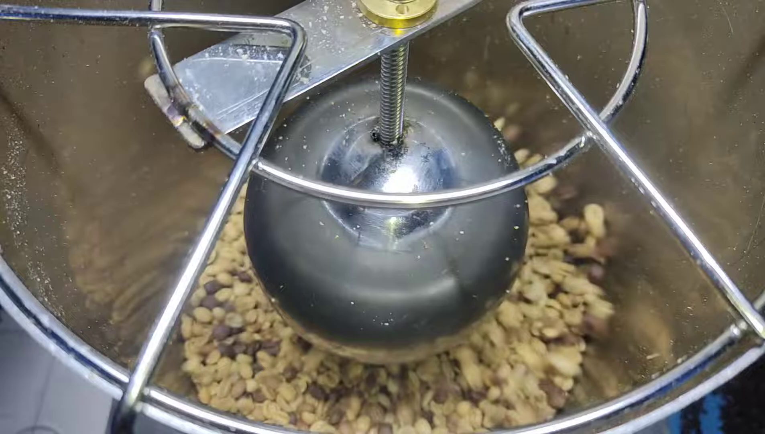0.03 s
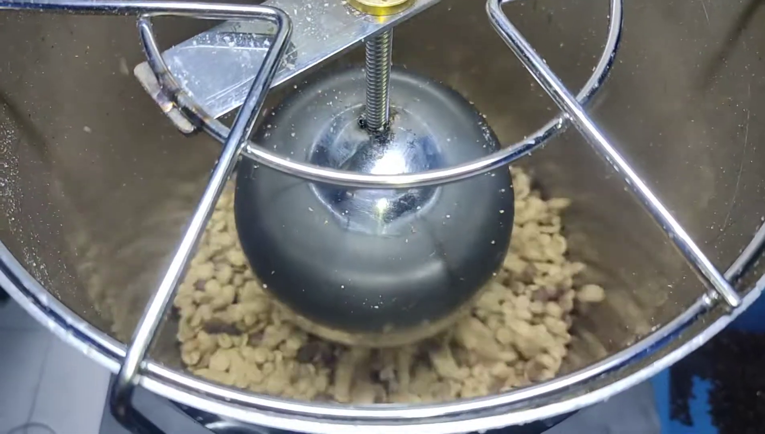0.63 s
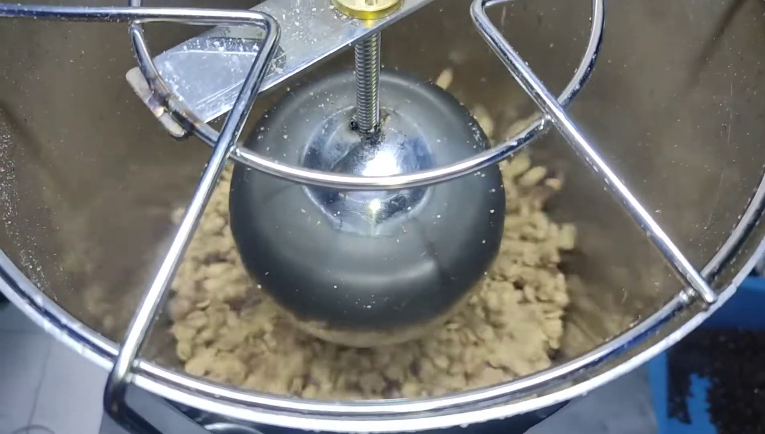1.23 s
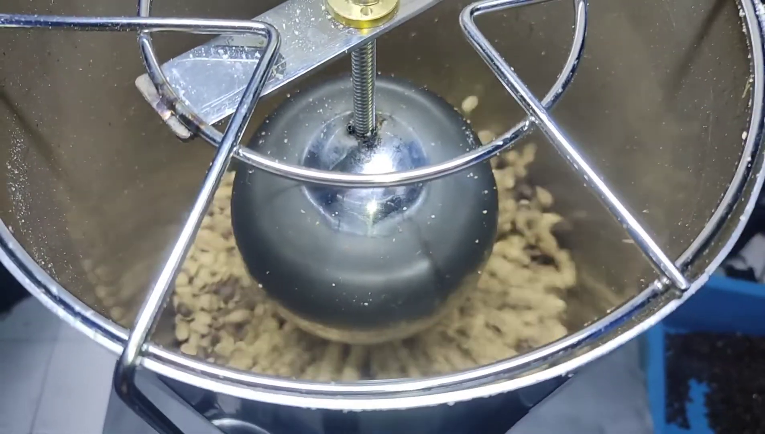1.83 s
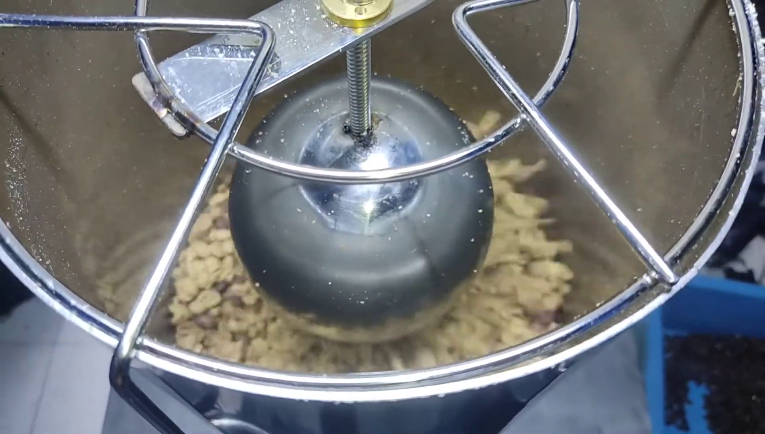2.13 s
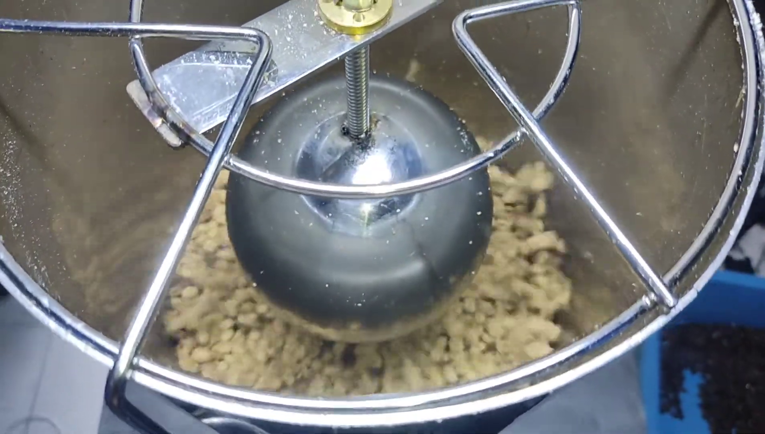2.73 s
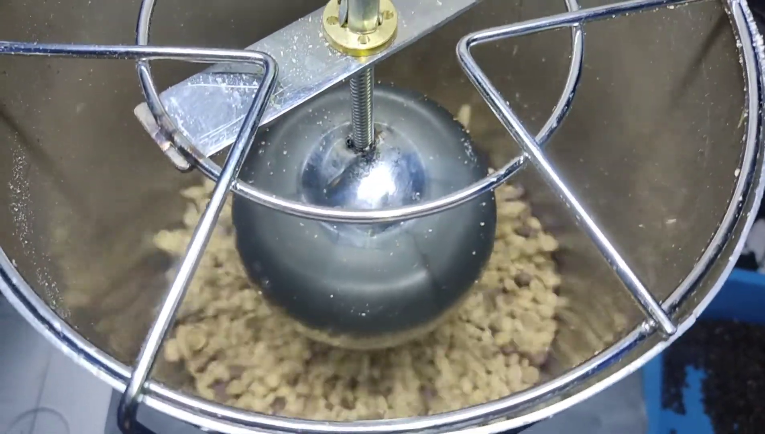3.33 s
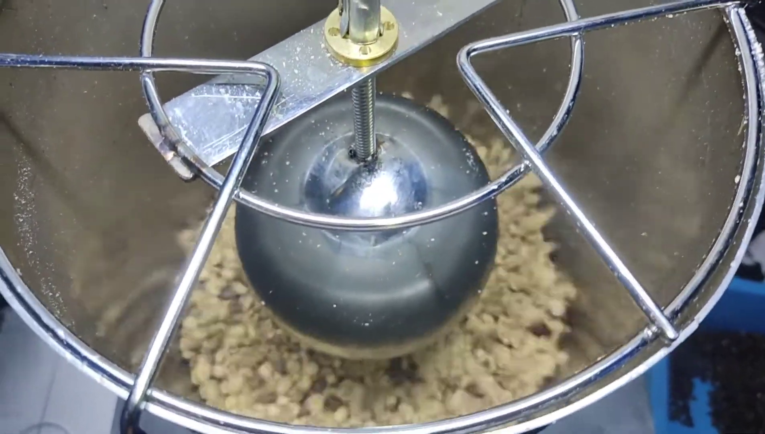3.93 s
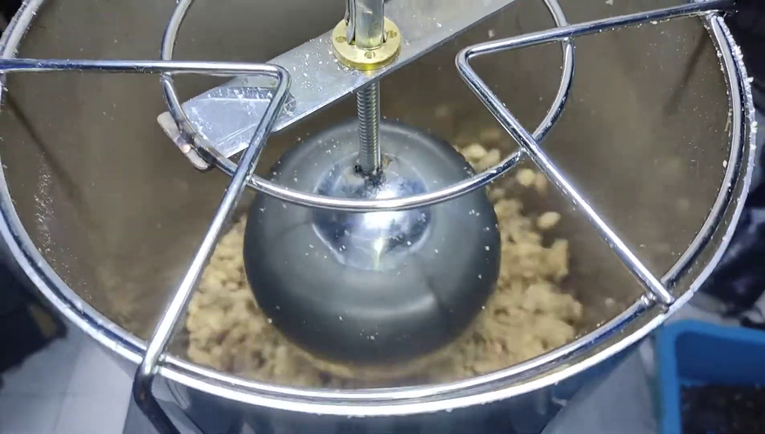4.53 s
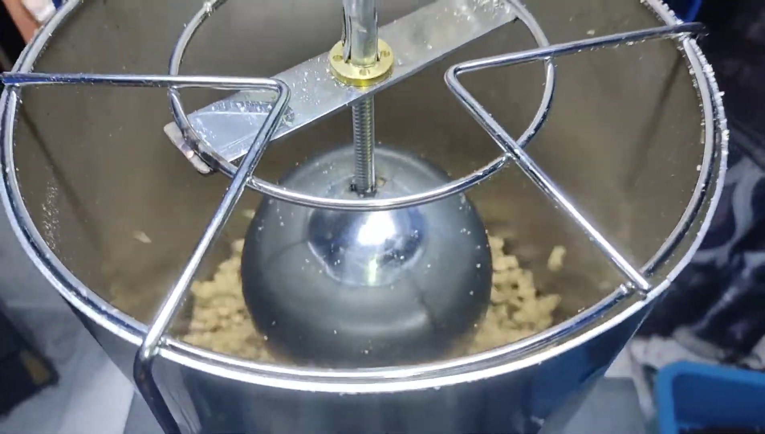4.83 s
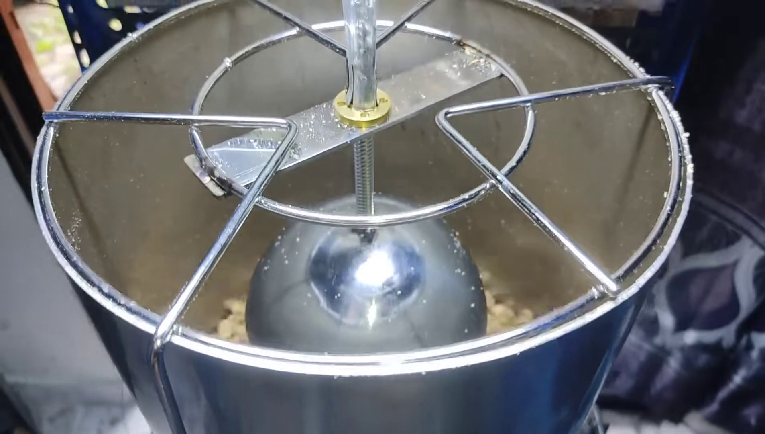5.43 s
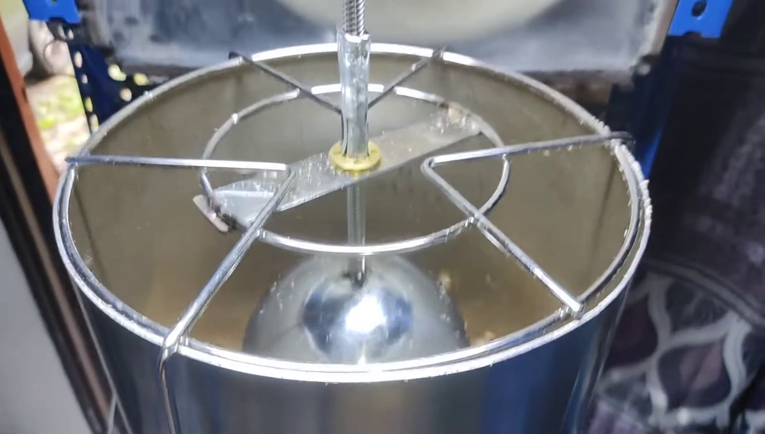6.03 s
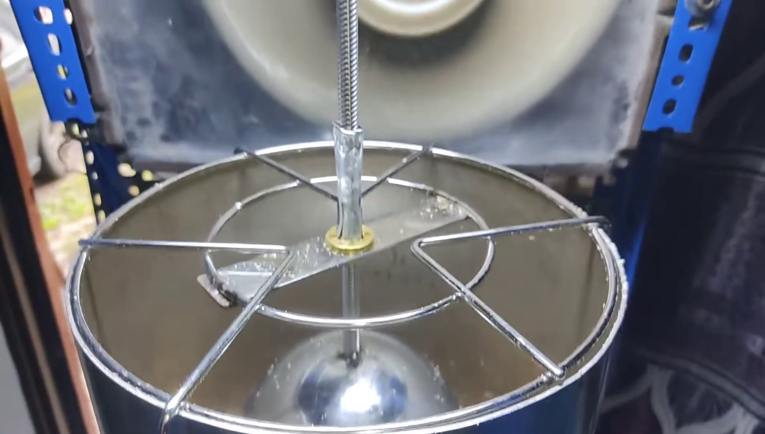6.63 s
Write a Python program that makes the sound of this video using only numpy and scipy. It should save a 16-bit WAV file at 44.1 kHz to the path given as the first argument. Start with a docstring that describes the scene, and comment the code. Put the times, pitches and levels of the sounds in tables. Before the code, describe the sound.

A hot-air coffee roaster roars steadily while beans churn and rattle in its steel drum, with a thin high whine.

```python
"""A hot-air coffee roaster, heard from just above its open steel drum. The sound fades in quickly:
the motor hums and the blower roars through the hollow drum. All along, thousands of beans a second
spout up, knock together, patter on the wall and keep a steel ball in the middle ringing with a thin
whine. Now and then one bean hits hard. At about 4.5 seconds the listener draws back from the drum,
so its hollow ringing fades and its brighter steel tones stand out."""
import sys
import numpy as np
from scipy import signal
from scipy.fft import rfft, irfft
from scipy.io import wavfile
from scipy.ndimage import uniform_filter1d

SR = 44100
rng = np.random.default_rng(int(sys.argv[2]) if len(sys.argv) > 2 else 0)


def wav_record(signal):
    """Record a signal, one row per channel, as 16-bit PCM in the file named by sys.argv[1]."""
    frames = np.transpose(np.atleast_2d(signal))
    bounded = np.clip(frames, -1, 1)
    # unit amplitude maps onto the largest positive 16-bit level
    quanta = np.round(bounded * 32767).astype(np.int16)
    wavfile.write(sys.argv[1], SR, quanta)


N = 294588
TIME = np.arange(N) / SR

# Puffs of rising air. Each row: middle in seconds, length in seconds, level in dB.
AIR_PUFFS = [(0.45, .08, -35), (.73, .1, -36), (1.4, .09, -36), (6.5, .45, -46)]
# The motor's hum. Each row: pitch in Hz, level in dB.
HUM_TONES = [(169, -37), (338, -43.5), (507, -42), (1724, -51)]
# The tone colour of rushing air. Each row: frequency in Hz, left and right relative level in dB.
ROAR_COLOUR = [(20, -19.5, -23), (55, -25.5, -22.5), (97, -18.5, -18.5), (138, -7, -14.5),
               (196, -3.5, -6.5), (285, -1, -5.5), (430, -4, -5.5), (620, -4, -5.5), (780, -3.5, -9),
               (1130, -9.5, -2.5), (1354, -6.5, -4), (1600, -17.5, -16), (3050, -28, -17.5),
               (8250, -49, -61)]
# Pitches that the air in drum and duct favours. Each row: pitch in Hz, width in Hz, boost in dB.
AIR_RESONANCES = [(186.4, 9.9, 4.5), (238.3, 50, 7.5), (278.7, 16, 6.5), (311, 9.2, 4.5), (370.6, 9.8, 3),
                  (436, 12, 1), (507, 49, 6), (554.6, 18.5, 5), (611.4, 21, 4)]
# Standing waves across the drum's mouth. Each row: pitch in Hz, width in Hz, left and right level
# in dB, change in dB after drawing back.
MOUTH_WAVES = [(859, 59, -31.5, -29, 2), (936, 94, -35, -44, 5), (1041, 212, -25, -22, -3)]
# Stronger gusts in the roar. Each row: middle in seconds, length in seconds, boost in dB.
ROAR_GUSTS = [(.78, .08, 2.5), (.98, 0.18, 1.4), (1.3, 0.12, 1.5), (1.73, .1, 1), (2.1, .1, 0.8),
              (2.39, 0.051, 1.7), (4.72, 0.092, 0.5), (5.95, .1, 1.8)]
# The drum's note swells with the stream. Each row: middle in seconds, length in seconds, boost in dB.
NOTE_SWELLS = [(.44, 0.11, 7), (1.1, .08, 3), (2.05, 0.15, 3), (2.38, 0.11, 7), (3.03, 0.073, 7),
               (4.01, 0.11, 10), (5.0, 0.083, 2), (5.16, 0.098, 9), (5.83, .07, 8.5)]
# Drum tones rung by beans. Each row: pitch in Hz, width in Hz, left and right level in dB,
# change in dB after drawing back.
DRUM_RINGS = [(1834, 216, -41, -30, -11.5), (2174, 250, -34.5, -32, -21), (3344, 110, -47, -40.5, -5),
              (4660, 130, -58, -53, 12), (5550, 100, -53, -47, 7.5), (5700, 54, -54, -42, 12),
              (6210, 170, -43, -49, 10), (7600, 430, -43, -38.5, 16), (8350, 710, -39, -49, 13),
              (9530, 200, -47, -54, 10)]
# The high pings of a faint shimmer. Each row: pitch in Hz, relative level in dB.
SHIMMER_TONES = [(3350, -44), (3800, -42), (4080, -41), (4340, -41.5), (4620, -40), (4860, -42),
                 (5280, -40), (5520, -40), (6110, -38.5), (6420, -39), (9830, -42), (10270, -43),
                 (10700, -42), (10950, -43), (11800, -42), (12400, -43), (12800, -41), (13530, -45)]
# Pitches that the steel wall favours or weakens. Each row: pitch in Hz, width in Hz, change in dB.
WALL_RESONANCES = [(2230, 200, 1.5), (2870, 180, 1.5), (3560, 170, -2), (3740, 120, 2.5), (5280, 110, 4),
                   (5520, 110, 3.5), (5880, 110, -3), (6070, 170, 4), (6750, 130, 3.5), (7480, 160, 1.5),
                   (8000, 140, -2.5), (8170, 300, 3.5), (9830, 100, 5), (10270, 140, 4), (10480, 110, -3),
                   (10620, 110, 4.5), (10900, 200, 3), (11816, 130, 3), (12010, 90, -2.5),
                   (12600, 220, 2.5), (13310, 150, -7), (13530, 140, 3)]
# The colour of bean on bean. Each row: frequency in Hz, left and right relative level in dB.
CLATTER_COLOUR = [(300, -20, -20), (1200, -9, -5), (1750, -8, -1.5), (2000, -8, -.5), (2250, -3.5, 2.5),
                  (2550, -6, -2.5), (2800, -4.5, -.5), (3600, -12, -8), (4700, -13, -9), (5800, -17, -15),
                  (8000, -20, -18), (14000, -30, -30)]
# The colour of bean on steel. Each row: frequency in Hz, left and right relative level in dB.
PATTER_COLOUR = [(2500, -28, -28), (4300, -13, -10), (5100, -14.5, -13), (5900, -13, -12.5),
                 (6450, -8.5, -7), (7100, -4, .5), (7650, -2, 5), (8300, -1, -2.5), (8950, 2.5, -5),
                 (9500, -3.5, -12), (10050, -15, -18.5), (10900, -11.2, -10.4), (11400, -12, -11.7),
                 (12900, -8.5, -7.2), (13400, -12, -12), (14200, -16, -16)]
# The spray on the wall thickens or thins. Each row: middle in seconds, length in seconds, change in dB.
BEAN_SPRAYS = [(1.9, 0.27, 1.5), (3.02, .12, 0), (3.32, 0.18, 1), (4.04, .1, 0.5), (4.4, .12, -0.5),
               (5.11, .06, 3), (5.4, 0.2, 2.5), (5.98, 0.17, 1.5), (6.27, 0.16, 3), (6.53, 0.21, 3.5)]
# Single beans that hit the wall hard. Each row: start in seconds, strength in dB.
HARD_HITS = [(1.182, -21), (1.251, -19), (1.392, -11), (4.278, -12), (4.659, -19), (4.701, -19),
             (5.119, -17), (6.389, -11)]
# The colour of a hard hit. Each row: frequency in Hz, left and right gain in dB.
HIT_COLOUR = [(800, -20, -20), (2300, -3, -1), (5500, -4, -3), (7700, 0, 2), (10000, -5, -6),
              (13000, -3, -3)]
# The ball's tones. Each row: pitch in Hz, seconds to fade by 60 dB, left and right relative level in dB.
BALL_TONES = [(8905, .05, -2, -4.5), (9188, .2, 5.5, -8)]
# More or fewer beans reach the ball. Each row: middle in seconds, length in seconds, change in dB.
WHINE_SWELLS = [(.4, .12, 3), (.69, 0.071, 6.5), (.9, 0.26, 5), (1.1, .06, 1), (1.33, 0.24, 5),
                (1.49, .06, -3), (1.6, .06, 7), (1.77, 0.092, -6), (2.2, 0.17, 2), (2.325, 0.05, 6),
                (2.56, 0.14, 4.5), (3.2, .06, 3), (3.36, 0.12, 1), (3.58, 0.19, -4), (3.85, 0.072, 4),
                (4.06, 0.077, 4.5), (4.23, 0.068, 5), (4.45, .1, -1), (4.66, .1, 4.5), (4.82, 0.077, 3),
                (4.99, .14, -5), (5.4, 0.17, 5.5), (5.87, 0.25, 7), (6.18, .08, 6), (6.35, .14, -7)]
# The opening fade. Each row: time in seconds, gain from 0 to 1.
FADE_IN = [(.2302, 0), (.2312, .22), (.28, .38), (.47, 1)]

LEFT_LAG_S = 0.00022  # the roar reaches the right ear first


def undb(db):
    """Turn decibels into a gain to multiply by."""
    return 10 ** (np.asarray(db) / 20)


def unit(x):
    """Scale a signal so that its average power is 1."""
    return x / np.sqrt(np.mean(x ** 2))


def flutter(per_s):
    """A smooth random wobble of size about 1, with per_s new values a second."""
    hold = int(SR / per_s)
    steps = rng.standard_normal(N)[np.arange(N) // hold]
    return unit(uniform_filter1d(uniform_filter1d(steps, hold), hold))


def hump(middle_s, length_s):
    """A rounded rise and fall, 1 at its middle."""
    return np.exp(-(2 * (TIME - middle_s) / length_s) ** 2)


def swelling(table):
    """A gain that smoothly rises or dips once for each row."""
    return undb(sum(db * hump(middle_s, length_s) for middle_s, length_s, db in table))


def drawn_back(near_db, change_db, start_s=4.55, length_s=0.86):
    """A layer's gain as the listener moves from above the mouth to beside the drum."""
    progress = np.clip((TIME - start_s) / length_s, 0, 1)
    return undb(near_db + change_db * (1 - np.cos(np.pi * progress)) / 2)


def resonance(x, hz, width):
    """What a hollow or a panel lets through around its own pitch, at power 1."""
    band = signal.butter(2, [hz - width / 2, hz + width / 2], "bandpass", fs=SR, output="sos")
    return unit(signal.sosfilt(band, x))


def colour(x, spectrum, resonances, size=4096):
    """Give each ear its tone colour, with a peak or dip at each resonance."""
    hz = np.maximum(np.arange(size // 2 + 1) * SR / size, 1)
    points, *sides = np.transpose(spectrum)
    db = np.array([np.interp(np.log(hz), np.log(points), side) for side in sides])
    for centre, width, boost in resonances:
        db = db + boost / (1 + (2 * (hz - centre) / width) ** 2)
    # build a filter that rings only after a sound, never before it
    cepstrum = irfft(np.log(undb(db)))
    cepstrum[:, 1:size // 2] *= 2
    cepstrum[:, size // 2 + 1:] = 0
    response = irfft(np.exp(rfft(cepstrum)))
    return signal.fftconvolve(x, response, axes=1)[:, :N]


def air_stream(room_db, flutter_db=-0.43):
    """Swirling air makes noise; part comes back from the room, different in each ear."""
    stream = rng.standard_normal(N) * undb(flutter_db * flutter(per_s=40))
    direct = np.array([np.interp(TIME - LEFT_LAG_S, TIME, stream), stream])
    return direct + undb(room_db) * rng.standard_normal((2, N))


def draught(steady_db=-50, cutoff_hz=35, left_boost_db=6.0):
    """Rising air buffets the microphones: a faint rumble with a few soft puffs."""
    low_pass = signal.butter(2, cutoff_hz, fs=SR, output="sos")
    rumble = signal.sosfilt(low_pass, air_stream(room_db=15))
    puffs = sum(undb(db) * hump(middle_s, length_s) for middle_s, length_s, db in AIR_PUFFS)
    return (undb(steady_db) + puffs) * unit(rumble * undb([[left_boost_db], [0]]))


def motor(wander=0.00184, waver_db=2):
    """The motor hums with tones that follow its slightly unsteady shaft."""
    shaft_s = np.cumsum(1 + wander * flutter(per_s=5)) / SR
    out = 0
    for hz, db in HUM_TONES:
        strength = np.sqrt(2) * undb(db + waver_db * flutter(per_s=7.6))
        out = out + strength * np.sin(2 * np.pi * hz * shaft_s)
    return out


def drum_note(hz=251, left_db=-29, right_db=-33, wander=0.01794, waver_db=2.5):
    """The stream blows the drum like a bottle: a hollow note that wavers around one pitch."""
    phase = 2 * np.pi * np.cumsum(hz * (1 + wander * flutter(per_s=30))) / SR
    lag = np.array([[2 * np.pi * hz * LEFT_LAG_S], [0]])
    strength = swelling(NOTE_SWELLS) * undb(waver_db * flutter(per_s=18))
    return np.sqrt(2) * undb([[left_db], [right_db]]) * strength * np.sin(phase - lag)


def standing_waves():
    """Swirling air also sounds the hollow tones that fit across the drum."""
    out = 0
    for hz, width, left_db, right_db, change_db in MOUTH_WAVES:
        gain = drawn_back(np.array([[left_db], [right_db]]), change_db)
        out = out + gain * resonance(air_stream(room_db=-5.5), hz, width)
    return out


def blower(gust_db=0.75):
    """The air stream roars in small gusts through the duct and drum."""
    gusts = undb(gust_db * flutter(per_s=22))
    return gusts * unit(colour(air_stream(room_db=-24.5), ROAR_COLOUR, AIR_RESONANCES))


def shimmer(count=260, ring_s=.065, pitch_spread=.014, spread_db=6.0, boost_db=1.0):
    """Dense, short, slightly detuned high pings give the rattle a faint ringing shimmer."""
    t = TIME[:int(ring_s * SR)]
    fading = undb(-60 * t / ring_s)
    out = 0
    for hz, db in SHIMMER_TONES:
        pings = np.zeros((2, N + len(t)))
        starts = rng.integers(0, N, count)
        for start, (detune, loudness) in zip(starts, rng.standard_normal((count, 2))):
            # each ear catches the wave at a different point in its cycle
            cycles = hz * (1 + pitch_spread * detune) * t + rng.random((2, 1))
            strength = undb(spread_db * min(loudness, 1))
            pings[:, start:start + len(t)] += strength * fading * np.sin(2 * np.pi * cycles)
        out = out + undb(db + boost_db) * unit(pings[:, :N])
    return out


def impacts(per_s, spread_db):
    """Clicks at random moments, some harder than others."""
    happens = rng.random(N) < per_s / SR
    strength = undb(spread_db * np.minimum(rng.standard_normal(N), 2))
    return happens * strength * rng.choice([-1, 1], N)


def drum_knocks(per_s, spread_db, crack_s, ring_s, ring_db, spots=16):
    """Beans land at several spots; each has its own crack and echoes round the wall to each ear."""
    t = TIME[:SR // 12]
    decay = np.exp(-t / crack_s) + undb(ring_db) * np.exp(-t / ring_s)
    out = 0
    for _ in range(spots):
        echoes = unit(decay * rng.standard_normal((2, len(t))))
        clicks = impacts(per_s / spots, spread_db)
        out = out + signal.oaconvolve(clicks[None], echoes, axes=1)[:, :N]
    return unit(out)


def drum_ringing():
    """Beans ring the drum: a hollow tone over the mouth, brighter steel tones from the side."""
    knocks = drum_knocks(per_s=900, spread_db=4.5, crack_s=0.0001, ring_s=0.0047, ring_db=-2, spots=12)
    out = 0
    for hz, width, left_db, right_db, change_db in DRUM_RINGS:
        gain = drawn_back(np.array([[left_db], [right_db]]), change_db)
        out = out + gain * resonance(knocks, hz, width)
    return out


def hard_hits(ring_s=.004):
    """A lone bean cracks against the wall and rings it briefly."""
    force = sum(undb(db) * (TIME >= s) * np.exp(-abs(TIME - s) / ring_s) for s, db in HARD_HITS)
    return colour(force * rng.standard_normal((2, N)), HIT_COLOUR, WALL_RESONANCES)


def ball_whine(flicker_db=1.3, even_s=0.067):
    """Beans strike the steel ball so often that its high, shimmering tones never die away."""
    out = 0
    for hz, fade_s, left_db, right_db in BALL_TONES:
        pole = np.exp((2j * np.pi * hz - np.log(1000) / fade_s) / SR)  # one sample's turn and decay
        ring = signal.lfilter([1], [1, -pole], impacts(per_s=500, spread_db=2))
        # the steady hail keeps the ringing equally strong over longer stretches
        power = uniform_filter1d(abs(ring) ** 2, int(even_s * SR))
        ring = ring / np.sqrt(power + 1e-9)
        # the two ears hear each tone a quarter cycle apart
        out = out + np.array([undb(left_db) * unit(ring.real), undb(right_db) * unit(ring.imag)])
    return swelling(WHINE_SWELLS) * undb(flicker_db * flutter(per_s=28)) * out


def bean_clatter():
    """Beans knock together in the churning heap and rattle the drum."""
    knocks = drum_knocks(per_s=1900, spread_db=3.5, crack_s=0.0001, ring_s=0.01, ring_db=-4.5)
    return unit(colour(knocks, CLATTER_COLOUR, WALL_RESONANCES))


def wall_patter():
    """Flung beans tick brightly on the steel wall, now and then in a thicker spray."""
    ticks = drum_knocks(per_s=650, spread_db=2.0, crack_s=0.00019, ring_s=0.015, ring_db=-7)
    return swelling(BEAN_SPRAYS) * unit(colour(ticks, PATTER_COLOUR, WALL_RESONANCES))


def scene(surge_db=.55):
    """Mix the air and the motor with the surging beans and the ringing ball."""
    roar = drawn_back(near_db=-18, change_db=-1) * blower() + standing_waves()
    air = swelling(ROAR_GUSTS) * roar + drum_note() + draught()
    clatter = drawn_back(near_db=-22, change_db=-1) * bean_clatter()
    patter = drawn_back(near_db=-16.5, change_db=-0.2) * wall_patter()
    rattle = clatter + patter + drum_ringing() + shimmer()
    surge = undb(surge_db * flutter(per_s=11))  # the bean spout surges at random
    mix = air + motor() + surge * rattle + hard_hits()
    return mix + drawn_back(near_db=-25.5, change_db=-3) * ball_whine()


def record(dry):
    """Fade the sound in, round off its highest peaks and cut the treble above 14100 Hz."""
    times, gains = np.transpose(FADE_IN)
    faded = np.interp(TIME, times, gains) * dry
    rounded = faded / (1 + (faded / .95) ** 6) ** (1 / 6)
    low_pass = signal.ellip(10, .1, 80, 14100, fs=SR, output="sos")
    return signal.sosfilt(low_pass, rounded)


dry = scene()
out = record(dry)
wav_record(out)
```